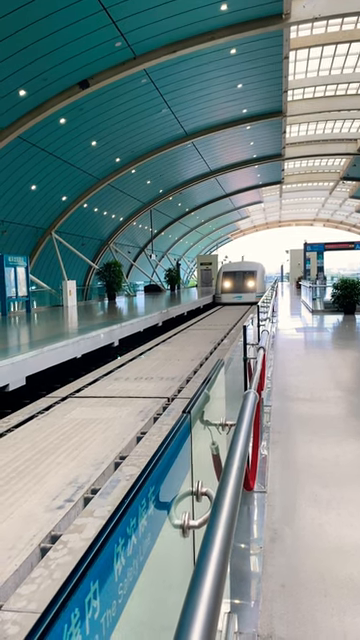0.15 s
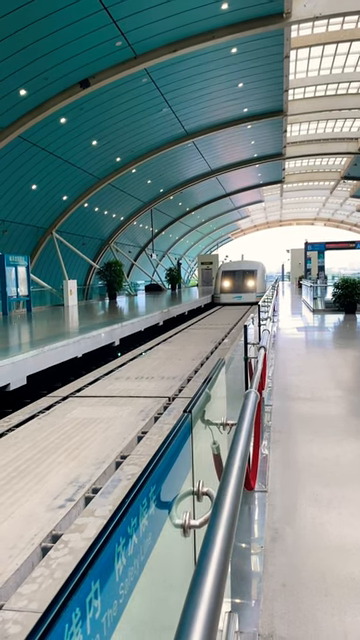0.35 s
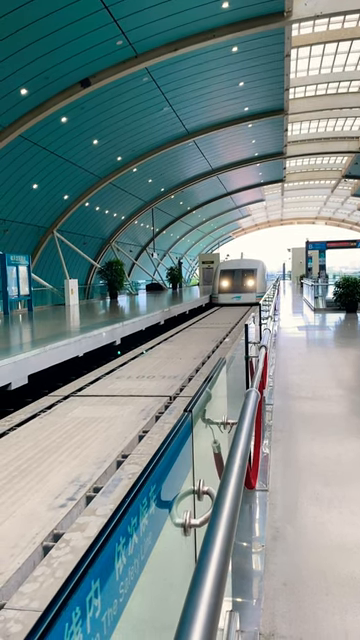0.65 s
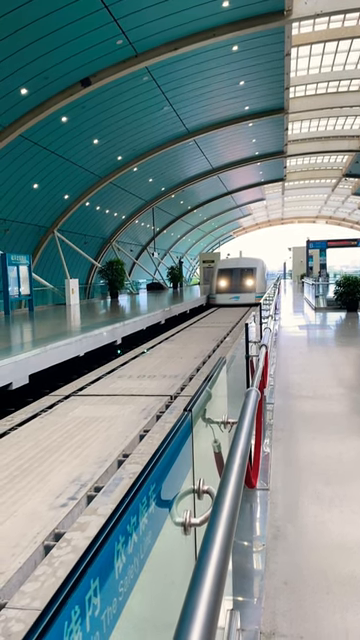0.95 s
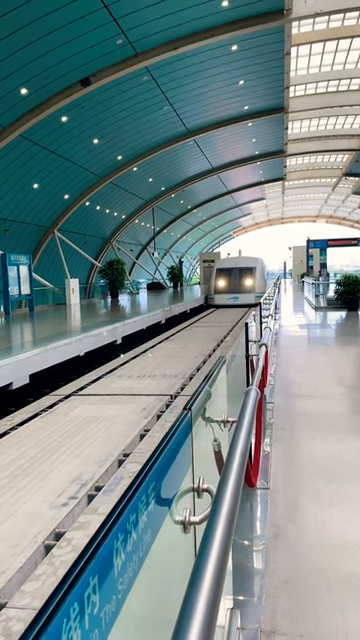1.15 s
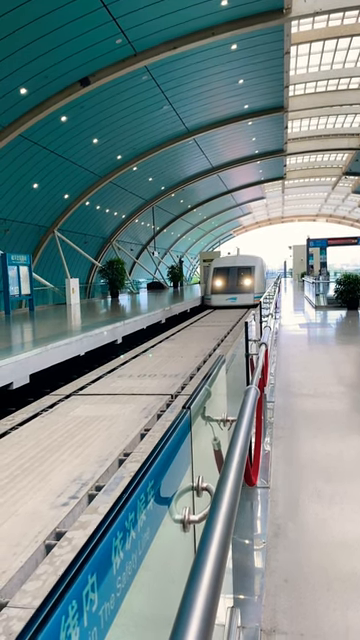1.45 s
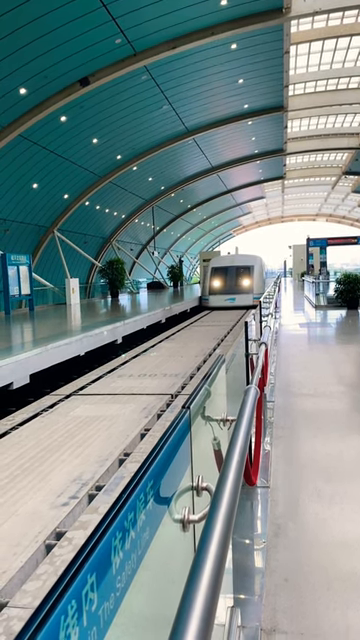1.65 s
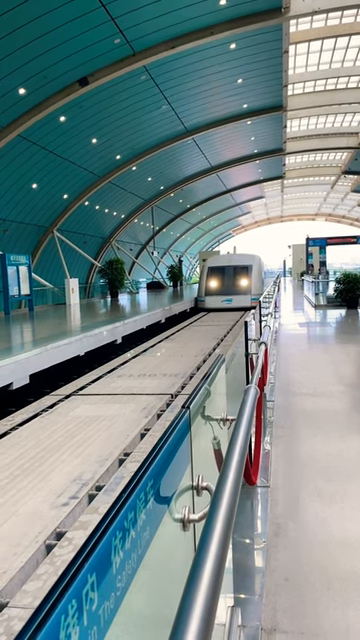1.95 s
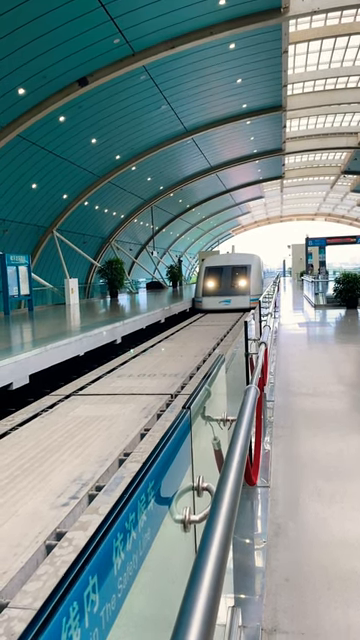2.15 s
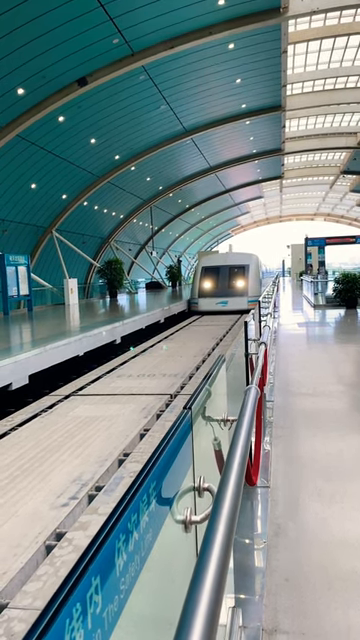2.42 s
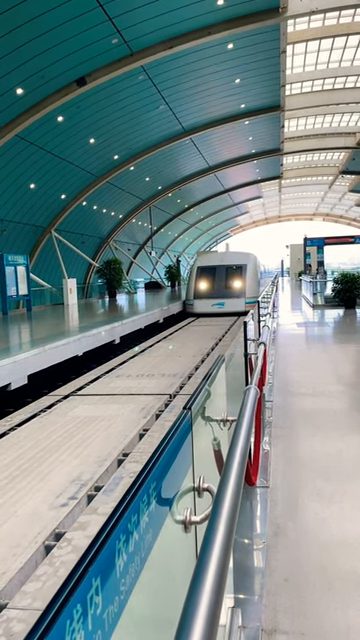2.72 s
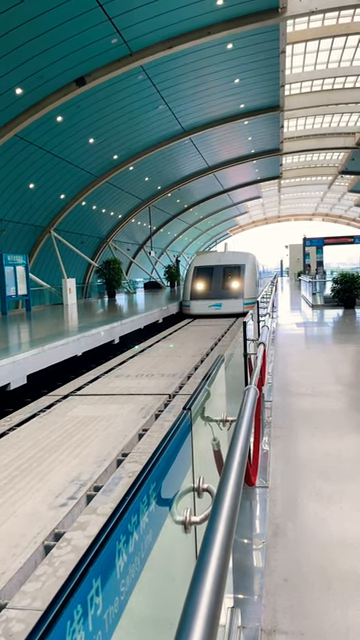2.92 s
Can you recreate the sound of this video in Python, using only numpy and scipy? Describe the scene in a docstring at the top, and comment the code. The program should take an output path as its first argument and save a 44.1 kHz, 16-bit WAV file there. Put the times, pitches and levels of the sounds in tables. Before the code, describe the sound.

A maglev train brakes into a large reverberant station, heard in stereo from the platform. Deep rumble and low growl run throughout, with a bass motor hum strongest before 0.5 s, pulsing unevenly and sliding down in pitch. A faint drone wavers above. Airy rush eases by 1 s, around a barely audible tick; hollow resonances bloom near 1.6 s. Rush and thin ringing hiss swell around 2.6 s, continuing to about 3 s.

```python
"""Maglev train braking into a vaulted station

Stereo microphones on the platform. The linear motor's harmonic tones fall with the speed and swell and fade
in the hall; a wavering drone lies over them and single resonances of the vault ring out.
Shaped noise makes the broad rush of train and hall, one faint tick, and a thin ringing hiss near the end.
"""
import sys
import numpy as np
from scipy import signal
from scipy.fft import rfft, irfft
from scipy.io import wavfile
from scipy.ndimage import uniform_filter1d

SR = 44100
rng = np.random.default_rng(int(sys.argv[2]) if len(sys.argv) > 2 else 0)


def wrap_up_sound(samples):
    """Save the sound to the file named by the first command line argument, as 16-bit audio."""
    columns = np.atleast_2d(samples).T
    # keep every value between -1 and 1, then stretch to whole-number steps
    tamed = np.clip(columns, -1, 1)
    steps = np.round(tamed * 32767).astype(np.int16)
    wavfile.write(sys.argv[1], SR, steps)


N = 135828
TIME = np.arange(N) / SR  # s
FREQ = np.maximum(np.fft.rfftfreq(N, 1 / SR), 1)  # Hz, kept above zero for the logarithm

SWELL_S = .045  # span over which the hall rounds a change of level
CENTRED_HZ = 220  # well below this both microphones hear nearly the same
FLUTTER_DB, FLUTTER_HZ = 0.78, 8.9  # rms depth and bandwidth of the level flutter


def undb(db):
    """Decibels to gain."""
    return 10 ** (np.asarray(db) / 20)


def unit(x):
    """Scale to rms 1."""
    return x / np.sqrt(np.mean(np.abs(x) ** 2))


def fader(points):
    """Gain over time from (start_s, level_db) points, rounded by the hall's reverberation."""
    level_db = np.interp(TIME, *np.array(points).T)
    return uniform_filter1d(undb(level_db), int(SWELL_S * SR))


def across(points):
    """Values over log frequency from (freq_hz, value) points."""
    hz, value = np.array(points).T
    return np.interp(np.log(FREQ), np.log(hz), value)


def swell(centre_s, half_s):
    """A smooth bell-shaped rise and fall around one moment."""
    return np.exp(-.5 * ((TIME - centre_s) / half_s) ** 2)


def wander(width_hz):
    """Slow random gain, which also changes sign: the sum of many shifting reflections."""
    shape = np.exp(-(np.fft.fftfreq(N, 1 / SR) / width_hz) ** 2)
    return unit(np.fft.ifft(shape * np.fft.fft(rng.standard_normal(N))))


def tone(hz, width_hz, scatter):
    """A line with a clean direct share and a share scattered by the hall."""
    turn = np.exp(2j * np.pi * np.cumsum(hz * np.ones(N)) / SR)
    share = np.clip(scatter, 0, 1)
    direct = np.sqrt(1 - share ** 2)
    return unit((turn * (direct + share * wander(width_hz))).real)


def ring(hz, width_hz):
    """A narrow resonance kept ringing by turbulence."""
    return tone(hz, width_hz, scatter=1)


# What differs between the two microphones, before the bass is drawn to the centre
# share of the sound that differs: freq_hz, share_db
WIDTH = [(60, -44.5), (160, -28), (270, -17.5), (420, -15.5), (550, -11.5), (760, -15), (950, -7.5),
         (1200, -14.5), (1400, -10), (1800, -18), (2250, -6), (2500, -3), (2850, -4.5), (3200, -4.5),
         (3700, -10), (4600, -9), (5200, -8), (6300, -3), (7200, -37), (8600, -18), (12000, -17)]
# balance, left minus right: freq_hz, balance_db
BALANCE = [(170, 0.5), (480, -1.6), (600, .3), (780, 5.5), (1050, 0.5), (1300, 3.5), (1550, -2), (2350, 0),
           (2650, -1), (3000, 0), (5000, -0.5)]
# lead of the left microphone: freq_hz, lead_rad
LEAD = [(200, 0), (450, .08), (690, 0.6), (1050, -0.05), (1800, -1), (2240, 0.15), (2560, 1.3),
        (3200, 0.78), (4450, 0.7), (4950, -0.7), (5500, 1.1), (6000, 1.5), (6900, 3.5), (8000, 2),
        (8500, 5), (10000, 5.5), (11300, 8), (12400, 8.5)]


def hall_noise(colour):
    """Turbulent noise spread by the hall: narrow in the bass, wide in the treble, gently fluttering."""
    mid, side = rfft(rng.standard_normal((2, N))) * undb(across(colour))
    spread = np.array([[1], [-1]]) * FREQ ** 2 / (FREQ ** 2 + CENTRED_HZ ** 2)
    balance = undb(spread * across(BALANCE) / 2)
    lead = np.exp(.5j * spread * across(LEAD))
    pair = irfft((mid + spread * side * undb(across(WIDTH))) * balance * lead, N)
    flutter = undb(FLUTTER_DB * unit(wander(FLUTTER_HZ).real))
    return unit(pair) * flutter


MOTOR_HZ, SLOWING_HZ_PER_S = 78.4, 10.3  # starting pitch of the hum, and its fall with the speed
# The motor's hum, swelling and fading on the platform: start_s, level_db
HUM_LEVEL = [(0, -26), (.1, -14.5), (.19, -24), (.28, -16), (.43, -16.5), (.57, -26), (.7, -23), (1.0, -29),
             (1.13, -24), (1.22, -23), (1.34, -17), (1.42, -21), (1.5, -35), (1.6, -24), (1.7, -22),
             (1.81, -35), (1.88, -23), (2.0, -21.5), (2.12, -28), (2.22, -25), (2.3, -19.5), (2.43, -16.5),
             (2.55, -22), (2.72, -31), (3.08, -23)]
# The octave above the hum: start_s, level_db
OCTAVE_LEVEL = [(0, -38), (.3, -31.5), (.6, -37), (1.0, -33), (1.35, -36), (1.5, -31), (1.7, -37),
                (1.8, -33), (1.92, -26.5), (2.03, -38), (2.13, -23.5), (2.25, -35), (2.58, -34),
                (2.68, -20.5), (2.76, -21), (2.84, -34), (3.08, -27)]
# Upper partials of the motor: multiple (of the hum's pitch), level_db (at the peak), peak_s, half_s
PARTIALS = [(3, -30.5, 2.75, .24), (4, -37.5, 2.3, .6), (5, -38, 1.64, .2)]


def motor():
    """The linear motor's harmonics fall with the speed; each upper one swells once, scattered by the hall."""
    hz = MOTOR_HZ - SLOWING_HZ_PER_S * TIME
    sound = tone(hz, width_hz=9, scatter=.15) * fader(HUM_LEVEL)
    sound = sound + tone(2 * hz, width_hz=14, scatter=.4) * fader(OCTAVE_LEVEL)
    for multiple, db, peak_s, half_s in PARTIALS:
        partial = tone(round(multiple) * hz, width_hz=7.8, scatter=0.72)
        sound = sound + undb(db) * partial * swell(peak_s, half_s)
    return sound


# Wavering pitch of the drone: start_s, pitch_hz
DRONE_PITCH = [(0, 203), (.3, 199), (.55, 196), (.72, 203), (.95, 203), (1.4, 197), (2.0, 200), (2.3, 206),
               (2.7, 200), (3.08, 204)]
# Level of the drone: start_s, level_db
DRONE_LEVEL = [(0, -38), (.25, -33.5), (.55, -32), (.83, -29.5), (1.05, -37), (1.5, -37.5), (1.85, -42),
               (2.15, -37), (2.38, -32.5), (2.62, -41), (2.9, -31.5), (3.08, -32)]


def drone():
    """A low drone wavers around one pitch, blurred by the hall."""
    hz = np.interp(TIME, *np.array(DRONE_PITCH).T)
    return tone(hz, width_hz=18, scatter=.55) * fader(DRONE_LEVEL)


# Spectrum of the rumble: freq_hz, density_db (per Hz, relative)
RUMBLE_COLOUR = [(20, -27), (35, -6), (50, 0), (90, 3.5), (135, -4), (175, -9), (260, -18), (600, -67.5)]
# Level of the rumble: start_s, level_db
RUMBLE_LEVEL = [(0, -26.5), (.5, -27), (1.1, -28.5), (2.1, -29), (2.5, -26.5), (3.08, -27)]


def rumble():
    """The deepest part of the rush: bass noise filling the vault."""
    return hall_noise(RUMBLE_COLOUR) * fader(RUMBLE_LEVEL)


# Spectrum of the growl: freq_hz, density_db (per Hz, relative)
GROWL_COLOUR = [(100, -16), (160, -3.5), (215, 0), (270, -2), (330, -.5), (430, -8), (600, -19),
                (1200, -48)]
# Level of the growl: start_s, level_db
GROWL_LEVEL = [(0, -32), (.45, -33.3), (.75, -32.8), (1.1, -34.3), (1.6, -34), (2.15, -33), (2.35, -31),
               (3.08, -30)]


def growl():
    """The train's body growls: noise in the low midrange."""
    return hall_noise(GROWL_COLOUR) * fader(GROWL_LEVEL)


# Spectrum of the train's midrange roar: freq_hz, density_db (per Hz, relative)
ROAR_COLOUR = [(200, -8), (420, -7), (530, -2), (660, 0.5), (780, -2.5), (880, -7.5), (1200, -8.5),
               (1600, -21.5), (3000, -68)]
# Level of the roar: start_s, level_db
ROAR_LEVEL = [(0, -33), (.45, -34), (1.0, -38), (1.7, -34), (2.1, -36.5), (2.65, -34), (3.08, -35.5)]
# Resonances ringing in the roar: pitch_hz (before drift), width_hz, level_db (against the roar)
ROAR_RINGS = [(613, 18, -17), (666, 14, -14), (788, 30, -13.5)]
ROAR_DRIFT, ROAR_DRIFT_HZ = .02, 2  # rms share of the pitch, and bandwidth of the drift


def roar():
    """The train's midrange noise, with narrow ringing resonances whose pitches drift slowly."""
    sound = hall_noise(ROAR_COLOUR)
    for hz, width_hz, db in ROAR_RINGS:
        drift = 1 + ROAR_DRIFT * unit(wander(ROAR_DRIFT_HZ).real)
        sound = sound + undb(db) * ring(hz * drift, width_hz)
    return sound * fader(ROAR_LEVEL)


# Spectrum of the rushing air: freq_hz, density_db (per Hz, relative)
AIR_COLOUR = [(400, -37), (900, 0), (1200, -2.5), (1700, -2.5), (2300, -3.5), (2800, -9.5), (4000, -16),
              (7000, -47)]
# Level of the rushing air: start_s, level_db
AIR_LEVEL = [(0, -38), (.15, -37.5), (.4, -39), (.7, -41.5), (1.05, -44.5), (1.6, -43.5), (2.15, -43.5),
             (2.4, -41.5), (2.7, -40), (3.08, -41.5)]


def air():
    """Air rushes through the vault: turbulent noise above the roar."""
    return hall_noise(AIR_COLOUR) * fader(AIR_LEVEL)


# Spectrum of the hiss: freq_hz, density_db (per Hz, relative)
HISS_COLOUR = [(1200, -22), (2500, 0), (3300, 1), (4200, -1.5), (5100, -2.5), (6000, -6), (7000, -9),
               (8000, -13.5), (9500, -20), (12000, -41)]
# Level of the hiss: start_s, level_db
HISS_LEVEL = [(0, -45), (.35, -45), (.7, -50.5), (1.1, -50), (1.6, -46.5), (2.1, -48.5), (2.4, -45),
              (2.7, -43.7), (3.08, -46)]


def hiss():
    """The train's hiss fills the vault: treble noise."""
    return hall_noise(HISS_COLOUR) * fader(HISS_LEVEL)


# Surges of air: peak_s, half_s, centre_hz, level_db (at the peak)
SURGES = [(.1, .3, 1850, -42), (2.66, .27, 3050, -48)]
# Spectrum of a surge: multiple (of its centre), density_db (per Hz, relative)
SURGE_COLOUR = [(.3, -50), (.6, -10), (.85, 0), (1.25, -2), (1.5, -20), (3, -65), (6, -110)]


def surges():
    """Surges of air: bands of noise, one swelling at the start and a brighter one near the end."""
    sound = 0
    for peak_s, half_s, centre_hz, db in SURGES:
        colour = [(centre_hz * multiple, density_db) for multiple, density_db in SURGE_COLOUR]
        sound = sound + undb(db) * hall_noise(colour) * swell(peak_s, half_s)
    return sound


# Resonances of the vault that ring out: peak_s, pitch_hz (at the peak), glide_hz_per_s, half_s,
# level_db (at the peak)
BLOOMS = [(.12, 608, -60, .07, -37), (.13, 770, -40, .06, -41), (1.52, 763, 90, .08, -39),
          (1.62, 116, -4, .1, -27), (1.63, 799, 80, .06, -40), (1.75, 655, 300, .04, -35),
          (2.28, 115, 0, .08, -34), (2.67, 668, 50, .07, -38)]
BLOOM_BLUR = .045  # width of a resonance as a share of its pitch
BLOOM_DIFFUSE_HZ = 650  # well above this a resonance is mostly scattered


def blooms():
    """Vault resonances swell, glide and die: low ones beat with the motor's octave, high ones are diffuse."""
    sound = 0
    for peak_s, hz, glide, half_s, db in BLOOMS:
        pitch = hz + glide * (TIME - peak_s)
        scatter = hz / np.hypot(hz, BLOOM_DIFFUSE_HZ)
        sound = sound + undb(db) * tone(pitch, BLOOM_BLUR * hz, scatter) * swell(peak_s, half_s)
    return sound


# Spectrum of the tick: freq_hz, density_db (per Hz, relative)
TICK_COLOUR = [(3000, -16), (6000, -2), (8500, 2), (11500, 1), (15500, -2)]
TICK_S, TICK_DECAY_S, TICK_DB = .949, .006, -46.5  # onset, time constant, level at the onset


def tick():
    """One faint bright tick on the platform: a burst of noise that starts at once and decays."""
    age = TIME - TICK_S
    decay = (age > 0) * np.exp(-np.abs(age) / TICK_DECAY_S)
    return undb(TICK_DB) * hall_noise(TICK_COLOUR) * decay


# Spectrum of the thin high hiss: freq_hz, density_db (per Hz, relative)
SIZZLE_COLOUR = [(5500, -12), (7000, -4), (8400, 2), (10000, 5), (11300, 2), (12300, -10)]
# Rings of the thin hiss: pitch_hz, width_hz, level_db (at the peak)
SIZZLE_RINGS = [(9170, 50, -67), (9660, 120, -74), (10330, 110, -76)]
SIZZLE_S, SIZZLE_HALF_S, SIZZLE_DB = 2.56, 0.31, -58.5  # peak, half length, noise level at the peak


def sizzle():
    """A thin ringing hiss, likely collector shoes sliding on the power rail, swells and fades."""
    sound = undb(SIZZLE_DB) * hall_noise(SIZZLE_COLOUR)
    for hz, width_hz, db in SIZZLE_RINGS:
        # each microphone hears its own scattering
        pair = np.array([ring(hz, width_hz) for _ in range(2)])
        sound = sound + undb(db) * pair
    flat_topped = np.exp(-.5 * ((TIME - SIZZLE_S) / SIZZLE_HALF_S) ** 4)
    return sound * flat_topped


def scene():
    """Everything as it reaches the platform; the train's noise has nothing above about 14 kHz."""
    tones = motor() + drone() + blooms()
    train = rumble() + growl() + roar() + air() + hiss() + surges() + sizzle()
    train_top = signal.butter(16, 14000, fs=SR, output="sos")  # low-pass, Hz
    return tones + signal.sosfilt(train_top, train) + tick()


FADE_IN_S, TOP_HZ = .008, 15760


def record(dry):
    """The recorder opens softly and cuts the top with a steep low-pass."""
    fade_in = np.minimum(TIME / FADE_IN_S, 1)
    low_pass = signal.ellip(8, .2, 70, TOP_HZ, fs=SR, output="sos")  # ripple and stopband in dB
    return signal.sosfilt(low_pass, dry * fade_in)


dry = scene()
out = record(dry)
wrap_up_sound(out)
```